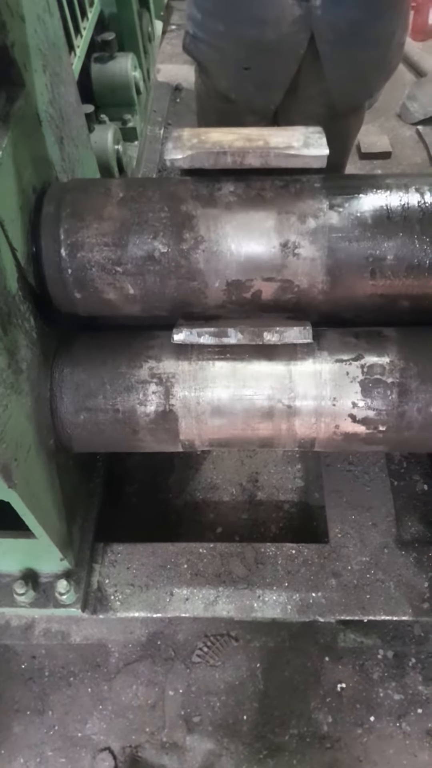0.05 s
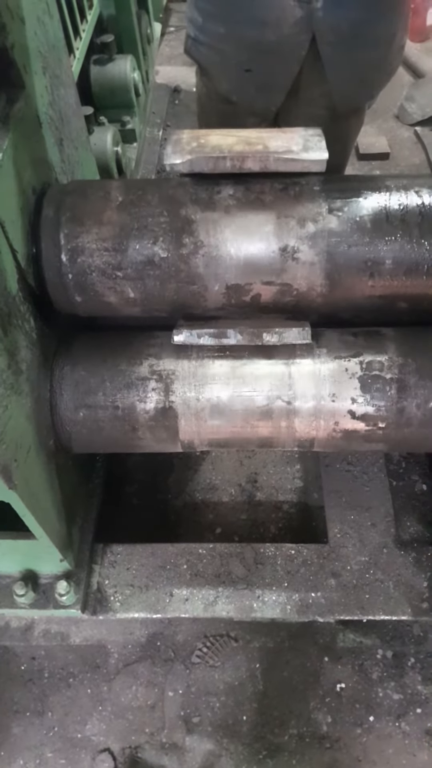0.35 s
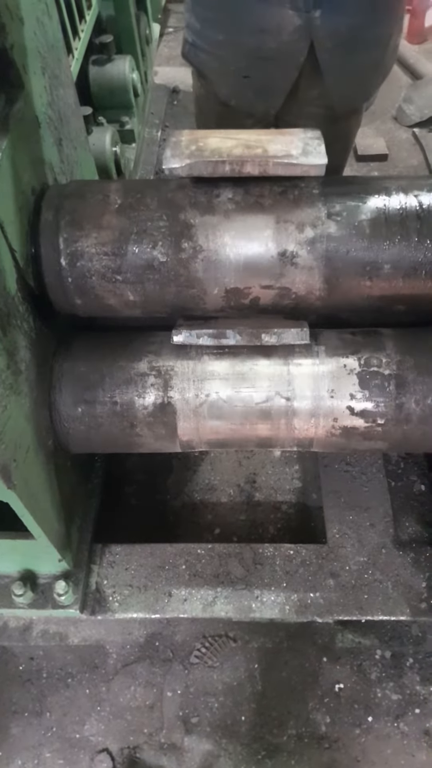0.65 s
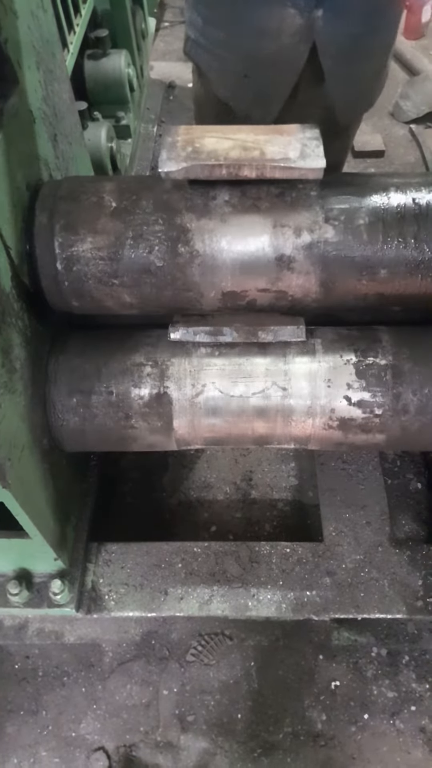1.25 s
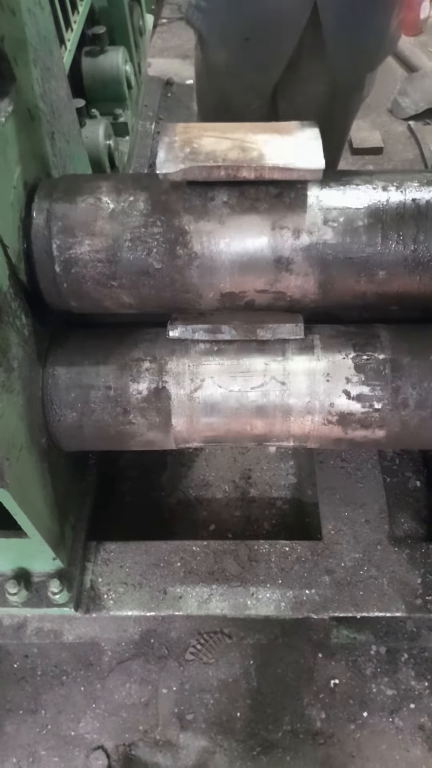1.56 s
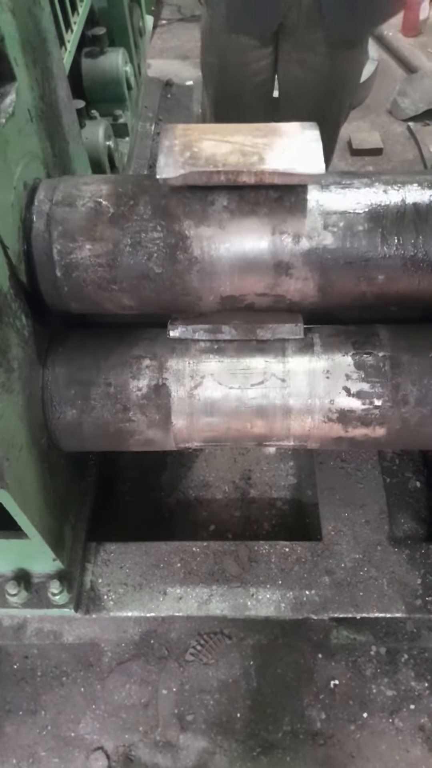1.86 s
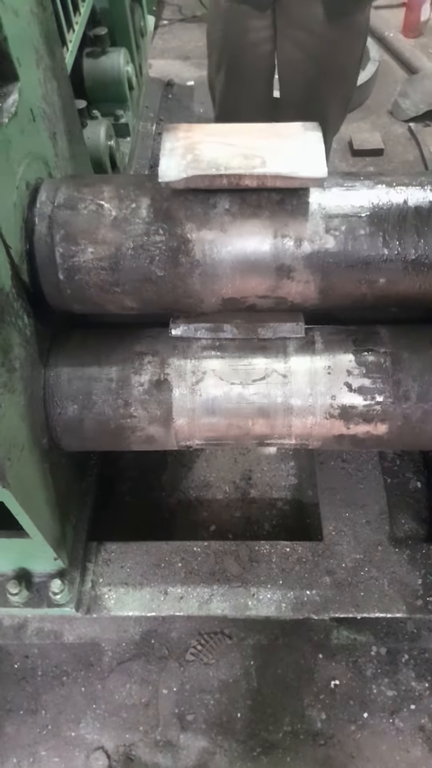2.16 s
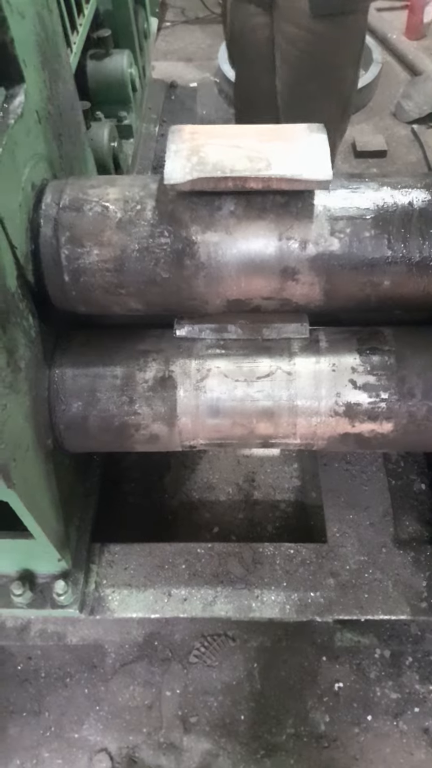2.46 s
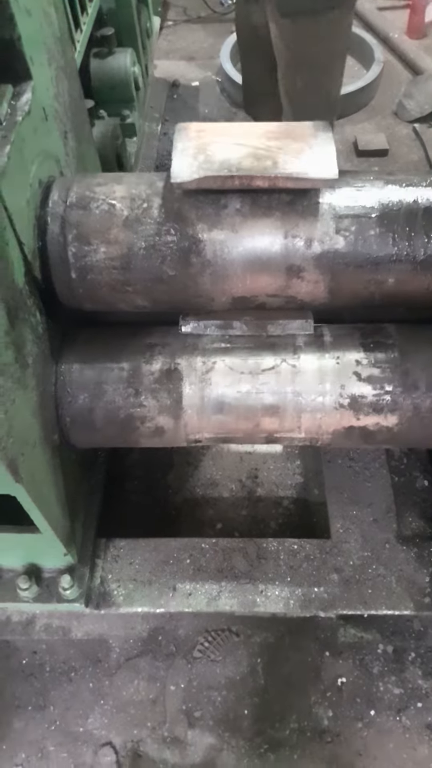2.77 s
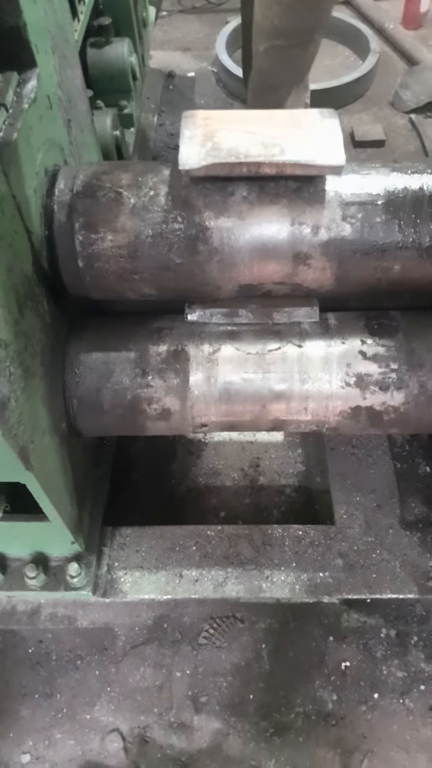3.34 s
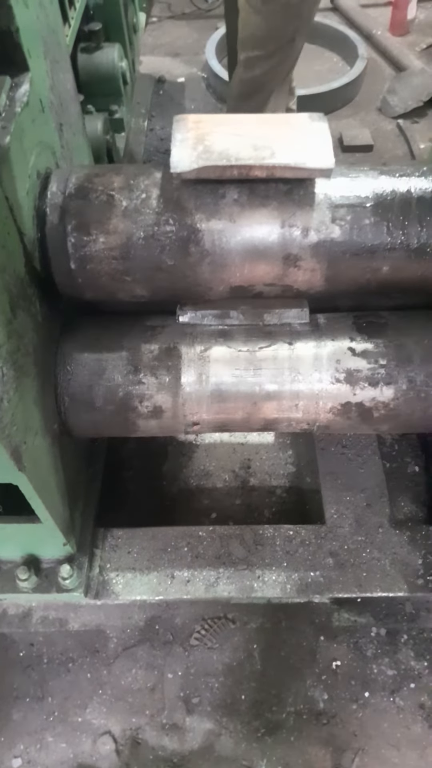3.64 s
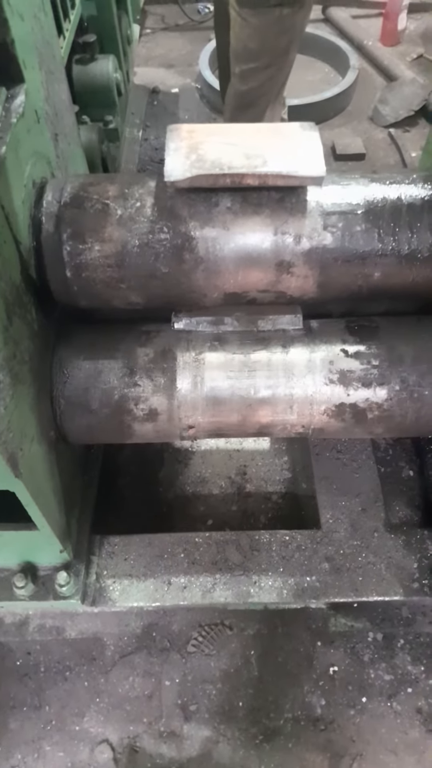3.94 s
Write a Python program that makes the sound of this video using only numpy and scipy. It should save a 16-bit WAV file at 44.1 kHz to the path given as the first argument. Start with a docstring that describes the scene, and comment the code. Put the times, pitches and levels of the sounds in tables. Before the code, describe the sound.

Low, throbbing machine hum and rumble in a workshop, with ringing metal crashes and a short squeal.

```python
"""A throbbing hum over a rough rumble: the gear train of a plate rolling machine in a large workshop,
singing at multiples of its tooth rate. Slack in the drive knocks dully and the bearings hiss lightly.
Two metal crashes wash in from across the hall and a closer clank follows, each leaving steel ringing.
Then steel squeals briefly as it slips under load. A few tiny ticks sound nearby."""
import sys
import numpy as np
from scipy import signal
from scipy.fft import rfft, irfft
from scipy.io import wavfile

SR = 44100
rng = np.random.default_rng(int(sys.argv[2]) if len(sys.argv) > 2 else 0)


def bounce(signal):
    """Save signal as a 16-bit WAV file at the path given by the first command-line argument."""
    frames = np.transpose(np.atleast_2d(signal))
    limited = np.clip(frames, -1, 1)
    pcm = np.round(limited * 32767).astype(np.int16)
    wavfile.write(sys.argv[1], SR, pcm)


N = 176400
TIME = np.arange(N) / SR

# Stereo image of the machine and of the blows. Each row: frequency in Hz, left-right likeness
# (1 is mono), balance in dB (positive is left).
MACHINE_IMAGE = [(60, 1, -0.2), (180, 0.99, 1.5), (362, 0.9, -0.5), (556, 0.3, 0), (880, 0.048, -1),
                 (1700, 0.091, 4), (3500, 0.11, 7), (5500, 0.01, 2.5), (7360, 0.092, -2),
                 (12000, 0.11, -1.5)]
BLOW_IMAGE = [(400, 0.27, 3.5), (1200, 0, 0), (3200, 0, 8.5), (5500, 0.02, 5), (7500, 0, -1.5),
              (12000, 0.15, -1)]

# Tone colours of the noise layers. Each row: frequency in Hz, relative level in dB.
TICK_COLOUR = [(2000, -30.5), (8000, -13), (11000, -3.5), (13000, 1.5), (15700, -2)]
HISS_COLOUR = [(150, -22.5), (600, -31.5), (1200, 0), (1700, 0.5), (2500, -4.5), (3500, -10.5),
               (5500, -11.5), (6800, -17), (7600, -25), (8500, -44.5), (11000, -62.5)]
SIZZLE_COLOUR = [(2000, -49.5), (6000, -20.5), (8700, -12.5), (10200, -6), (12600, -0.5), (14300, -4),
                 (15700, -12)]
KNOCK_COLOUR = [(150, -15.5), (400, 1), (600, 4), (950, -8), (1500, -22), (3000, -31.5), (8000, -59)]
RUMBLE_COLOUR = [(15, -51), (25, -39), (33, -30), (45, -8), (70, -4.5), (105, 2.5), (140, 2.5), (190, -2),
                 (270, 4), (400, 0), (520, -5), (750, -9), (1100, -18), (2000, -41.5), (6000, -86.5)]
CRACK_COLOUR = [(100, -22), (400, -7), (850, 12), (1050, 3), (1380, 7.5), (1850, -1), (2500, 1),
                (3300, -4.5), (5900, -7.5), (7500, -16.5), (9000, -26.5), (12000, -24), (15500, -24)]
WASH_COLOUR = [(100, -18.5), (400, 9), (850, 0.5), (1350, 1), (1800, 1), (2400, -2.5), (3500, -1.5),
               (5700, -3), (6800, -8), (7800, -19.5), (8700, -38), (11500, -27), (14000, -31),
               (15500, -47.5)]

# Cues for the tiny ticks and the drive's knocks. Each row: start in seconds, level in dB.
TICKS = [(1.182, -46), (1.463, -47), (1.909, -42), (2.069, -38)]
KNOCKS = [(0.279, -21), (0.568, -20), (0.635, -27), (2.321, -36), (2.443, -30), (2.712, -28), (3.892, -27)]
# Fader rides for the bearings' hiss and sizzle. Each row: time in seconds, level in dB.
HISS_LEVEL = [(0, -42), (.4, -41.5), (.6, -41.5), (.8, -45), (1.25, -45.5), (1.5, -42.5), (2.05, -41.5),
              (2.6, -40.5), (3.1, -41), (3.4, -39), (3.75, -42), (4, -43.5)]
SIZZLE_LEVEL = [(0, -68.5), (.38, -65.5), (.48, -71), (.62, -71), (.8, -73), (1.1, -72), (1.3, -69),
                (1.8, -68), (2.2, -63.5), (2.45, -63.5), (2.56, -62), (2.85, -64), (3.4, -59.5),
                (3.75, -66), (4, -65)]
# Resonances of drive and frame. Each row: pitch in Hz, width in Hz, level in dB, balance in dB.
FRAME_MODES = [(99.4, 19, -39, 0), (115, 5.4, -34.5, 2.8), (165.3, 7.1, -35, 1), (393.3, 54, -33, -3),
               (632, 9.9, -43, -7), (1723, 14, -51, 2.5), (2840, 120, -57, 7.5), (5580, 220, -64.5, 5.5)]

# Partials of the squeal. Each row: pitch in Hz, level before the surges in dB, balance in dB.
SQUEAL_PARTIALS = [(2453, -51, 4), (2882, -39, 12.5), (3304, -44.5, 11)]
# When each partial sings. Each row: start, hold and t60 (time to fade by 60 dB), all in seconds.
SQUEAL_TIMES = [(3.215, .11, .35), (3.157, .26, .85), (3.165, .26, .4)]
# Surges and dips of the slip. Each row: centre in seconds, half length in seconds, boost or cut in dB.
SLIP_SURGES = [(3.215, .02, 2), (3.315, .045, 4.5), (3.395, .018, -4.5), (3.475, .015, 2.5)]

# Blows on metal. Each row: start in seconds, level in dB, attack, hold and the wash's t60 at the pivot
# frequency in seconds, wash tilt in dB per octave, crack level in dB, crack t60 in seconds,
# ring boost in dB, ring length as a share of each mode's t60.
BLOWS = [(0.844, -30, 0.029, 0.088, 1.4, 0, -34.5, 0.15, -2, 0.78),
         (0.869, -50.5, 0.0026, .005, 0.35, 4, -32, 0.08, 7, 0.4),
         (1.598, -32, 0.019, 0.074, 1.18, -0.5, -35, 0.22, -3, .9),
         (2.638, -31, 0.0037, .012, 0.94, 1, -22, 0.19, -0.5, .25),
         (2.712, -45, .004, 0.0091, 0.61, -5, -40, 0.14, 1, .2)]
# Modes of the struck steel. Each row: pitch in Hz, level relative to the blow in dB, t60 in seconds.
STEEL_MODES = [(810, -20, 0.81), (1288, -17, 0.35), (1378, -9.5, 0.75), (2070, -23, .7), (2486, -16.5, 0.5),
               (3170, -23, 0.55), (3700, -19, 0.82), (4770, -21.5, 0.8), (5216, -18.5, 0.55),
               (5540, -15.5, 0.85), (5620, -15, 0.92), (6100, -18.5, 0.66)]

# Gear speed, sagging as the plate bends. Each row: time in seconds, tooth rate in Hz.
TOOTH_RATE = [(0.0, 50.77), (0.52, 51.19), (0.85, 50.93), (1.2, 51.11), (1.55, 50.75), (1.8, 50.99),
              (2.22, 50.54), (2.5, 50.64), (2.77, 50.33), (3.05, 50.38), (3.42, 50.35), (3.7, 50.61),
              (4.0, 50.11)]
# Fader rides for the four firm gear tones. Each row: time in seconds, level in dB.
THROB_LEVEL = [(0, -51), (.4, -38.5), (.48, -25), (.8, -31.5), (.98, -39), (1.13, -26.5), (1.35, -32.5),
               (1.85, -28.5), (2.04, -43), (2.28, -28.5), (2.48, -37), (2.7, -25.5), (2.97, -38),
               (3.2, -31), (3.48, -27), (3.65, -41), (3.9, -24), (4, -36)]   # the lowest
DRONE_LEVEL = [(0.0, -23.5), (0.27, -20.5), (0.53, -26.5), (0.9, -21), (1.18, -27), (1.5, -20.5),
               (1.77, -26), (2.12, -20), (2.5, -22.5), (2.7, -25.5), (3.0, -20), (3.3, -22.5),
               (3.72, -21.5), (4.0, -26.5)]   # the strongest
OCTAVE_LEVEL = [(0, -29.5), (.4, -24.5), (.6, -32.5), (.88, -28.5), (1.0, -24.5), (1.2, -22.5),
                (1.429, -29.5), (1.87, -24), (2.1, -27.5), (2.28, -32.5), (2.4, -27), (2.66, -23),
                (2.851, -35), (3.18, -25.5), (3.38, -31), (3.86, -23), (4, -35.5)]   # an octave above the drone
WHINE_LEVEL = [(0, -37), (.8, -34.5), (1.3, -40), (1.52, -29), (1.8, -39.5), (2.65, -41.5), (2.92, -28),
               (3.12, -38.5), (3.5, -28.5), (3.75, -43.5), (4, -29.5)]   # a twelfth above the drone
# For those four in turn: multiples of the tooth rate, then balances in dB.
FIRM_ORDERS = 2, 3, 6, 9
FIRM_BALANCE_DB = [0.5, 1.9, 3.6, -0.9]
# Weaker gear tones. Each row: multiple of the tooth rate, balance in dB, waver in dB,
# then the level in dB at each of the three bend stages.
WEAK_TONES = [(4, -1, 1.5, -27.5, -31.5, -31), (5, 3, 1.5, -31, -31.5, -36), (7, 1.7, 0.5, -38, -38, -29),
              (8, 1, 1, -33, -42, -37), (10, 0, 0.5, -42, -50, -52.5), (11, -0.5, 4.5, -43.5, -43.5, -42.5),
              (13, 0.5, -3.5, -43.5, -46, -42.5), (14, -1, -0.5, -50.5, -56, -50.5),
              (15, -0.5, 3.5, -44, -55, -54)]
# The bend stages, in seconds: plate feeding in, mid-bend, full bend.
BEND_STAGES_S = [0.4, 2.2, 3.0]


def from_db(db):
    """Decibels to gain."""
    return 10 ** (np.asarray(db) / 20)


def rms_one(x):
    """Scale to rms 1."""
    return x / np.sqrt(np.mean(x ** 2) + 1e-20)


def in_time(rows):
    """A control curve at every sample."""
    return np.interp(TIME, *np.transpose(rows))


def at_hz(points, hz, column=1):
    """Read one column of a table on a log-frequency axis."""
    points = np.array(points)
    return np.interp(np.log(hz + 1e-9), np.log(points[:, 0]), points[:, column])


def pan(db):
    """Left and right gains for a balance in dB."""
    ratio = from_db(db)
    return np.vstack([ratio, np.ones_like(ratio)]) * np.sqrt(2 / (1 + ratio * ratio))


def drift(rate_hz):
    """Smooth random wander of spread 1."""
    step, settle = 40, 2000   # samples per control step, steps for the filter to settle
    pole = np.exp(-2 * np.pi * rate_hz * step / SR)
    noise = rng.standard_normal(N // step + settle + 2)
    slow = signal.lfilter([1], [1, -2 * pole, pole * pole], noise)[settle:]
    return np.interp(np.arange(N) / step, np.arange(len(slow)), rms_one(slow))


def stereo_noise(colour, image):
    """Noise whose gain follows colour(Hz), with the likeness and balance of the image; rms 1."""
    hz = np.fft.rfftfreq(N, 1 / SR)
    mid, side = rfft(rng.standard_normal((2, N)))
    alike = np.clip(at_hz(image, hz), -1, 1)
    both = np.sqrt(1 + alike) * mid + np.sqrt(1 - alike) * side * [[1], [-1]]
    return rms_one(irfft(both * colour(hz) * pan(at_hz(image, hz, column=2)), N))


def broad_noise(colour, image):
    """Stereo noise shaped by a colour table."""
    return stereo_noise(lambda hz: from_db(at_hz(colour, hz)), image)


def resonance(centre_hz, width_hz, balance_db):
    """A narrow resonance shaken at random, as it arrives through the hall."""
    image = [(centre_hz, at_hz(MACHINE_IMAGE, centre_hz), balance_db)]
    return stereo_noise(lambda hz: 1 / (1 + ((hz - centre_hz) / (width_hz / 2)) ** 2), image)


def envelope(start, attack, hold, t60):
    """Linear attack, hold, exponential release."""
    age = TIME - start
    return np.clip(age / attack, 0, 1) * from_db(-60 * np.maximum(age - attack - hold, 0) / t60)


def ticks(balance_db=-6):
    """Tiny dry ticks, close by on the right."""
    bursts = sum(from_db(db) * envelope(start, attack=.0003, hold=0, t60=.008) for start, db in TICKS)
    return pan(balance_db) * bursts * broad_noise(TICK_COLOUR, MACHINE_IMAGE)


def bearings(hiss_flutter_db=1.12, sizzle_flutter_db=2.5):
    """The bearings give a fluttering hiss with a faint, uneven sizzle on top."""
    hiss_gain = from_db(in_time(HISS_LEVEL) + hiss_flutter_db * drift(13))
    hiss = hiss_gain * broad_noise(HISS_COLOUR, MACHINE_IMAGE)
    sizzle_gain = from_db(in_time(SIZZLE_LEVEL) + sizzle_flutter_db * drift(14))
    return hiss + sizzle_gain * broad_noise(SIZZLE_COLOUR, MACHINE_IMAGE)


def knocks():
    """Slack in the drive is taken up with short, dull knocks."""
    bursts = sum(from_db(db) * envelope(start, attack=.0024, hold=0, t60=.078) for start, db in KNOCKS)
    return bursts * broad_noise(KNOCK_COLOUR, MACHINE_IMAGE)


def rumble(tooth_phase, level_db=-23.5, pulse_depth=0.055):
    """Gears and rolls lay a bed of noise that swells with every tooth, and the shaken frame resonates."""
    rolling = from_db(level_db) * broad_noise(RUMBLE_COLOUR, MACHINE_IMAGE)
    frame = sum(from_db(db) * resonance(hz, width, balance) for hz, width, db, balance in FRAME_MODES)
    return rolling * (1 + pulse_depth * np.cos(tooth_phase)) + frame


def squeal(wobble_hz=7.23, scatter=0.75):
    """Slipping steel sings in surges on three partials, scattered by the hall."""
    wobble = wobble_hz * drift(15.3)
    out = 0
    for (hz, db, balance), (start, hold, t60) in zip(SQUEAL_PARTIALS, SQUEAL_TIMES):
        direct = pan(balance) * np.sqrt(2) * np.sin(2 * np.pi * np.cumsum(hz + wobble) / SR)
        partial = rms_one(direct + scatter * resonance(hz, width_hz=55, balance_db=balance))
        out += from_db(db) * partial * envelope(start, attack=0.06, hold=hold, t60=t60)
    surge_db = sum(db * np.exp(-((TIME - centre) / half) ** 2) for centre, half, db in SLIP_SURGES)
    return out * from_db(surge_db)


def blows(clatter_db=0.36, pivot_hz=3000, treble_damping=0.56):
    """Each blow: a crack, a clattering wash whose treble dies first in the hall, and ringing steel."""
    cracks = sum(from_db(crack_db) * envelope(start, attack, 0, crack_t60)
                 for start, _, attack, _, _, _, crack_db, crack_t60, _, _ in BLOWS)
    out = cracks * broad_noise(CRACK_COLOUR, BLOW_IMAGE)
    wash_spectrum = rfft(broad_noise(WASH_COLOUR, BLOW_IMAGE))
    bins_hz = np.fft.rfftfreq(N, 1 / SR)
    edges_hz = np.geomspace(300, 18000, 8)
    for low, high in zip(edges_hz, edges_hz[1:]):
        ratio = np.sqrt(low * high) / pivot_hz
        band = irfft(wash_spectrum * (bins_hz >= low) * (bins_hz < high), N)
        for start, db, attack, hold, t60, tilt, *_ in BLOWS:
            gain = from_db(db + tilt * np.log2(ratio))
            out += band * gain * envelope(start, attack, hold, t60 / ratio ** treble_damping)
    out *= from_db(clatter_db * drift(60))
    for hz, mode_db, mode_t60 in STEEL_MODES:
        balance = at_hz(BLOW_IMAGE, hz, column=2)
        mode = from_db(mode_db) * resonance(hz, width_hz=35, balance_db=balance)
        for start, db, attack, hold, *_, ring_db, share in BLOWS:
            out += mode * from_db(db + ring_db) * envelope(start, attack, hold, mode_t60 * share)
    return out


def gear_tone(tooth_phase, order, balance_db, wander_rad=0, left_lead_rad=0.18):
    """One harmonic of the meshing teeth, slightly ahead on the left."""
    phase = order * tooth_phase + rng.uniform(0, 2 * np.pi) + wander_rad
    return pan(balance_db) * np.sqrt(2) * np.sin(phase + np.array([[left_lead_rad], [0]]))


def gears(tooth_phase, waver_rate_hz=2, wander_rad=0.25):
    """Meshing teeth hum: four firm tones that swell with the load, and weaker ones that waver."""
    rides = THROB_LEVEL, DRONE_LEVEL, OCTAVE_LEVEL, WHINE_LEVEL
    out = sum(from_db(in_time(ride)) * gear_tone(tooth_phase, order, balance)
              for order, ride, balance in zip(FIRM_ORDERS, rides, FIRM_BALANCE_DB))
    for order, balance, waver_db, *stage_db in WEAK_TONES:
        gain = from_db(np.interp(TIME, BEND_STAGES_S, stage_db))
        waver = rms_one(from_db(waver_db * drift(waver_rate_hz)))
        out += gain * waver * gear_tone(tooth_phase, order, balance, wander_rad * drift(waver_rate_hz))
    return out


def scene():
    """The running machine and the metal noises around it."""
    tooth_phase = 2 * np.pi * np.cumsum(in_time(TOOTH_RATE)) / SR
    machine = gears(tooth_phase) + rumble(tooth_phase) + knocks() + bearings()
    return machine + blows() + squeal() + ticks()


def record(dry, cutoff_hz=15800):
    """A steep low-pass takes the very top off the mix."""
    return signal.sosfilt(signal.ellip(10, .1, 80, cutoff_hz, fs=SR, output="sos"), dry)


dry = scene()
out = record(dry)
bounce(out)
```